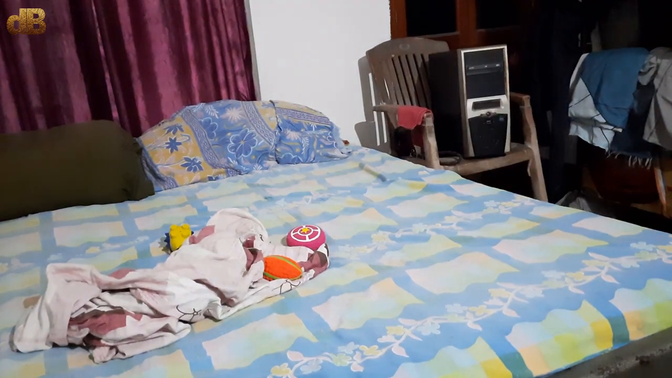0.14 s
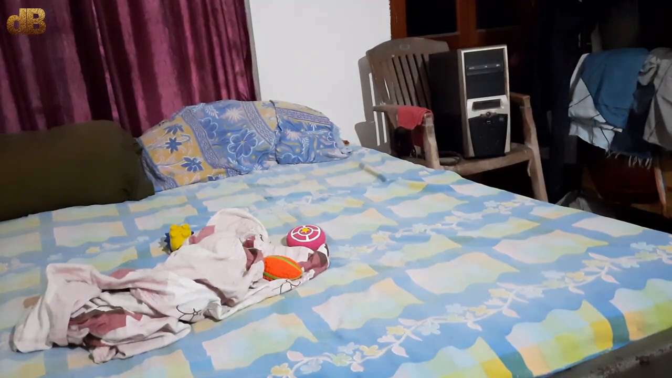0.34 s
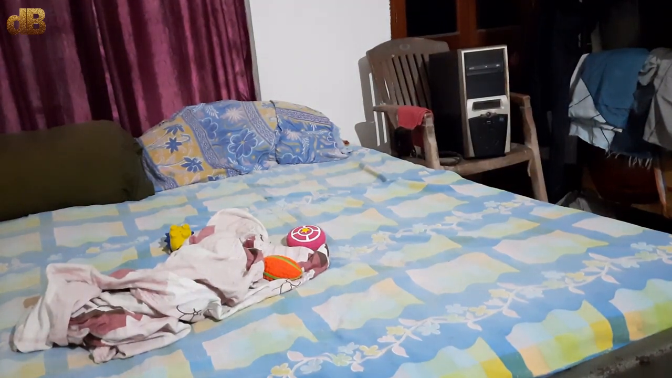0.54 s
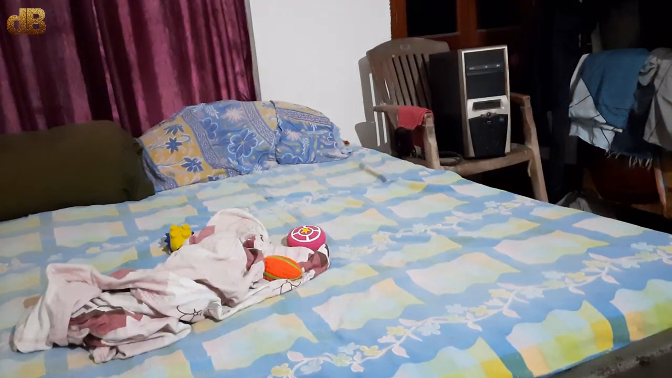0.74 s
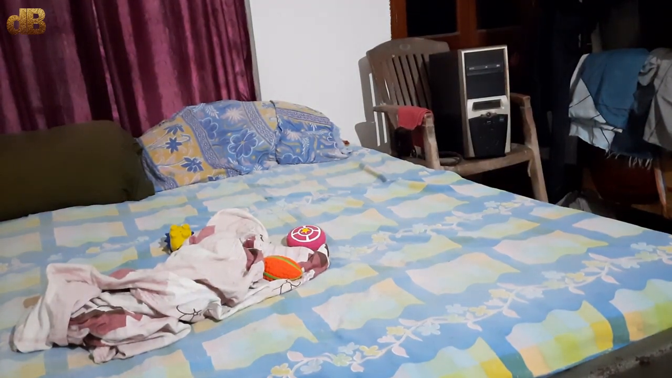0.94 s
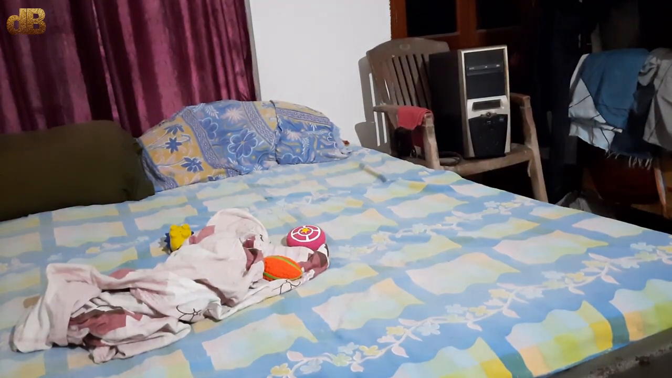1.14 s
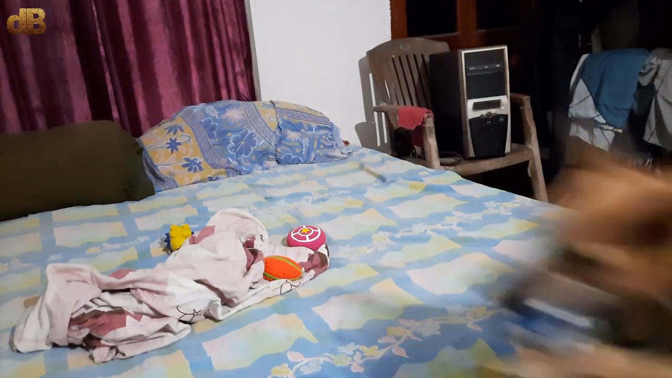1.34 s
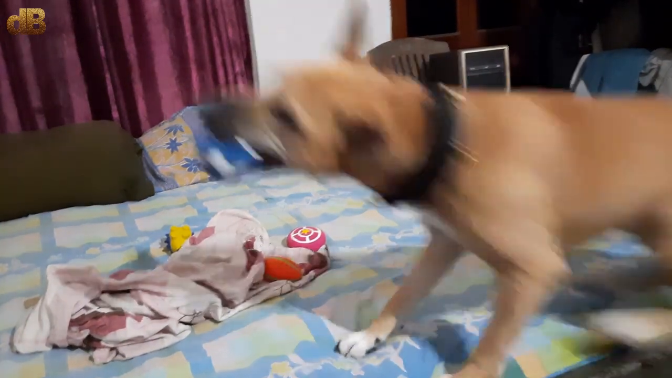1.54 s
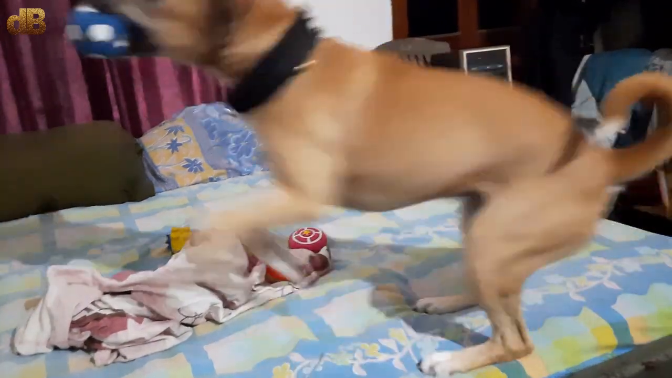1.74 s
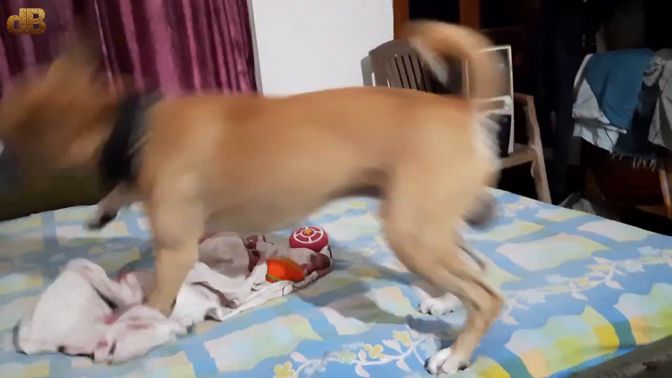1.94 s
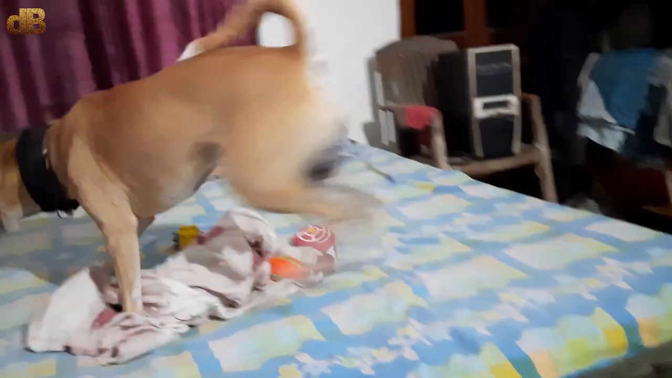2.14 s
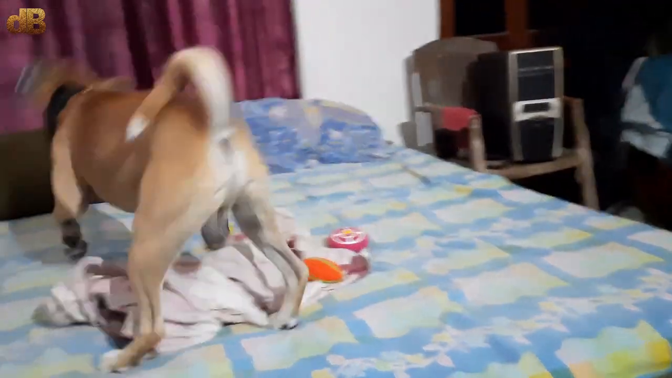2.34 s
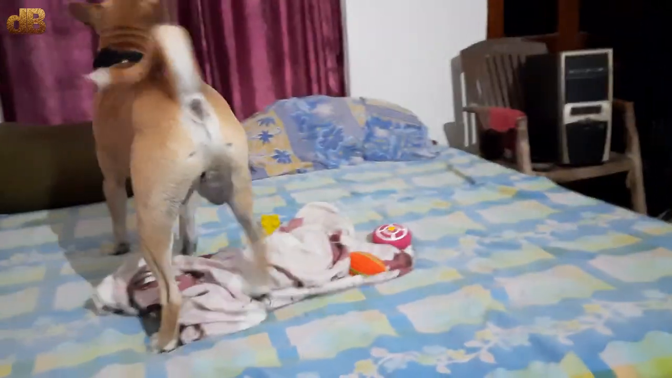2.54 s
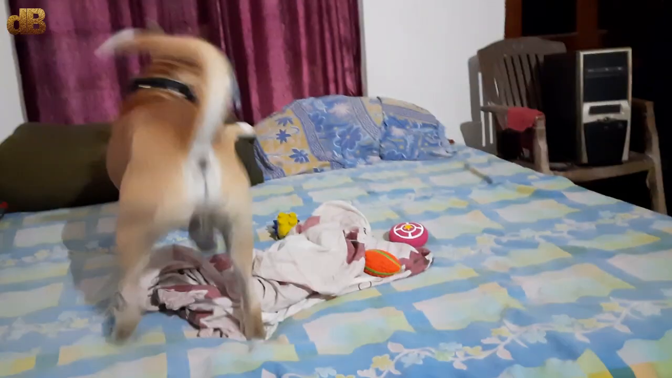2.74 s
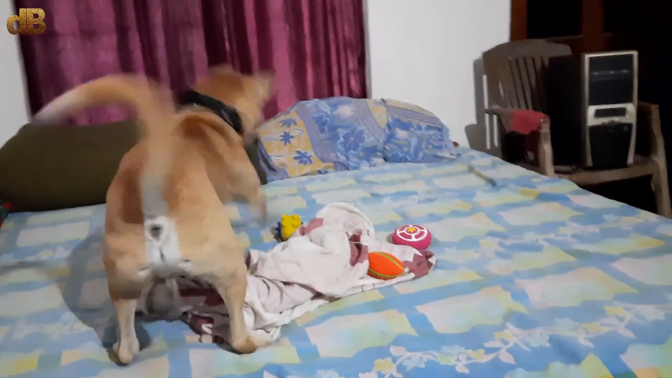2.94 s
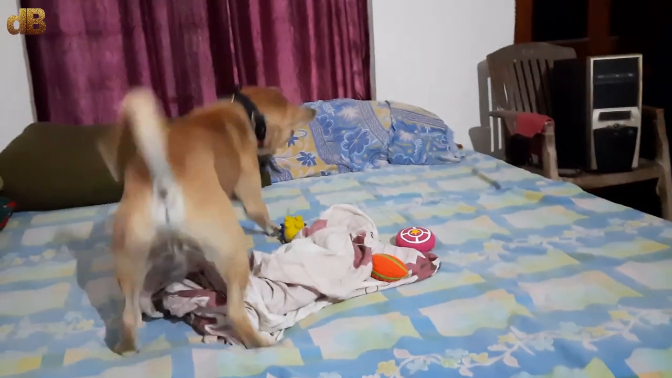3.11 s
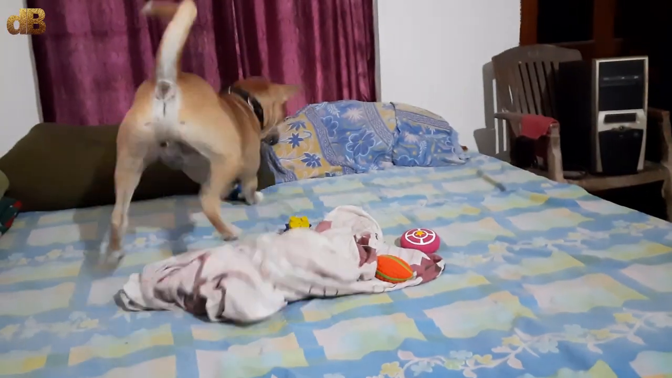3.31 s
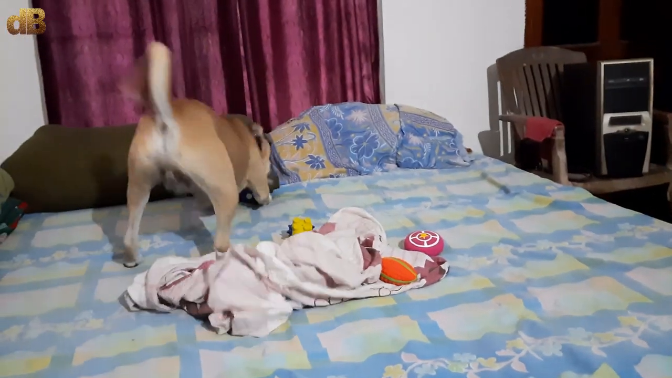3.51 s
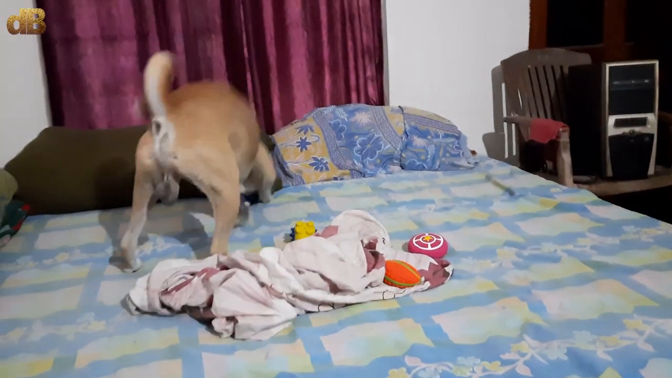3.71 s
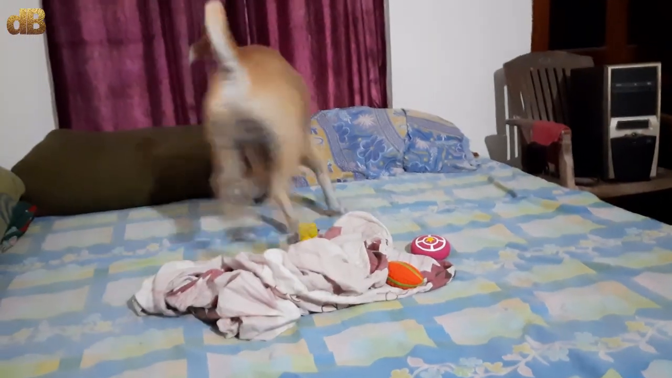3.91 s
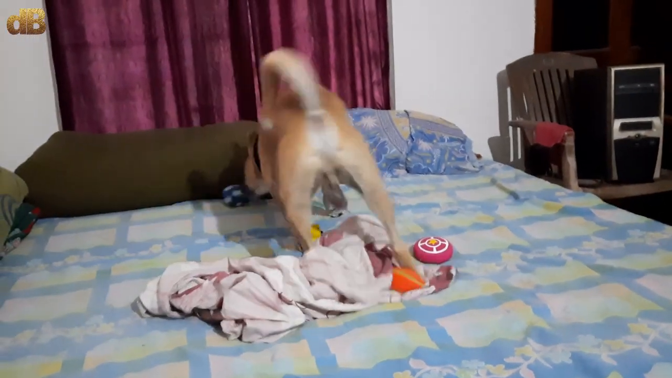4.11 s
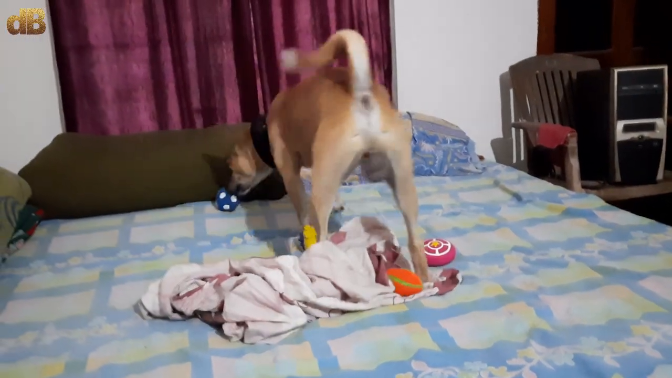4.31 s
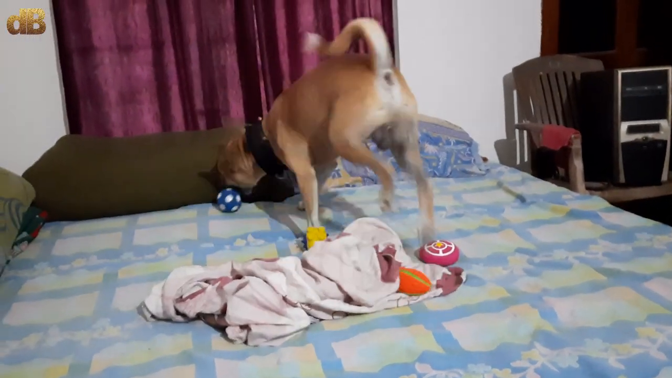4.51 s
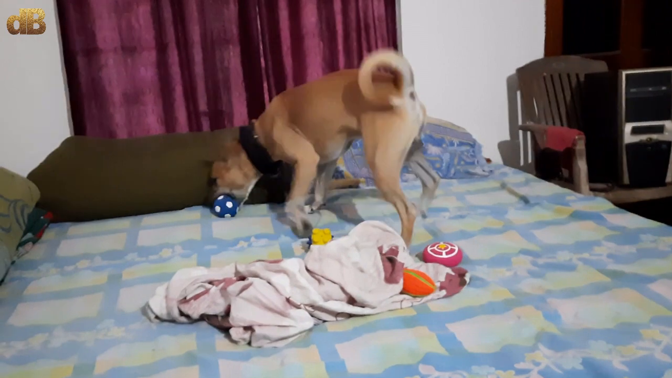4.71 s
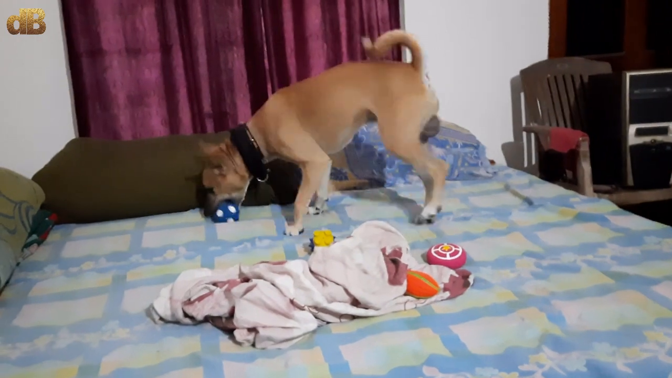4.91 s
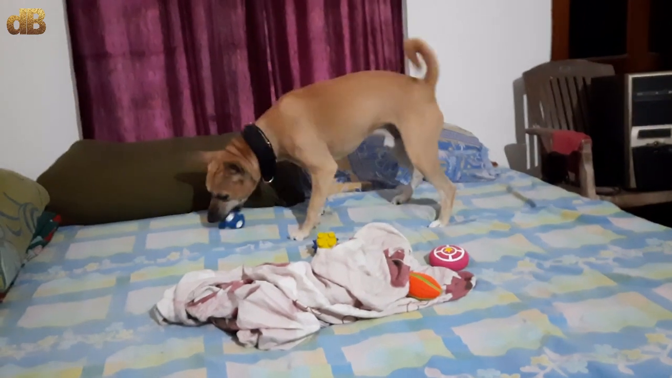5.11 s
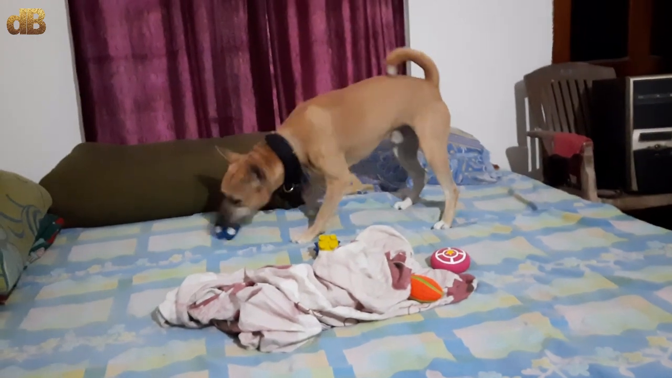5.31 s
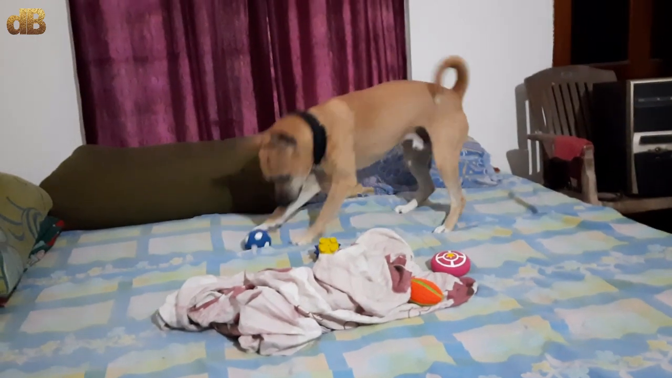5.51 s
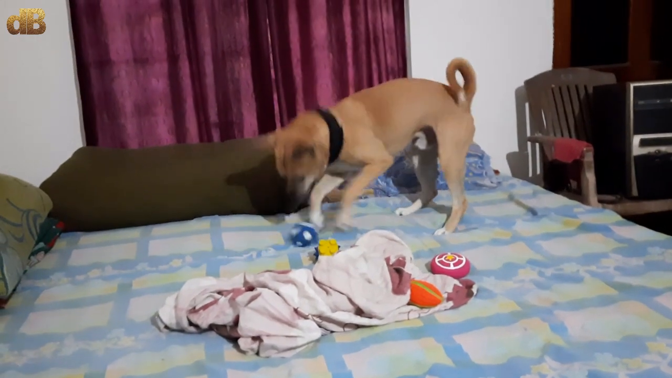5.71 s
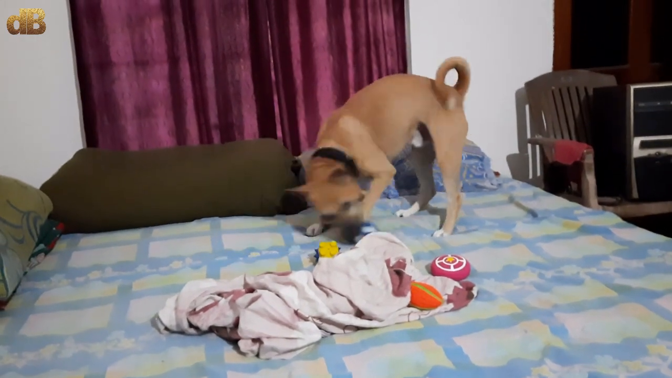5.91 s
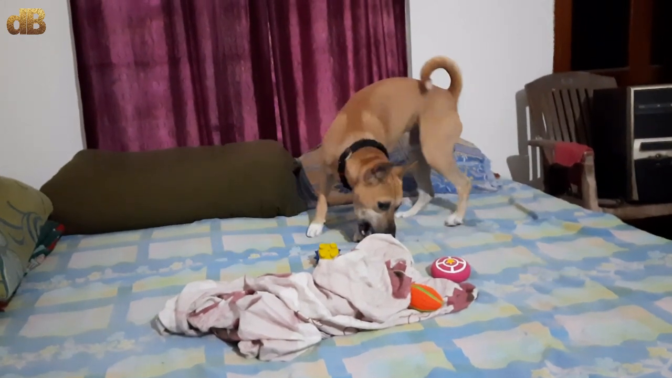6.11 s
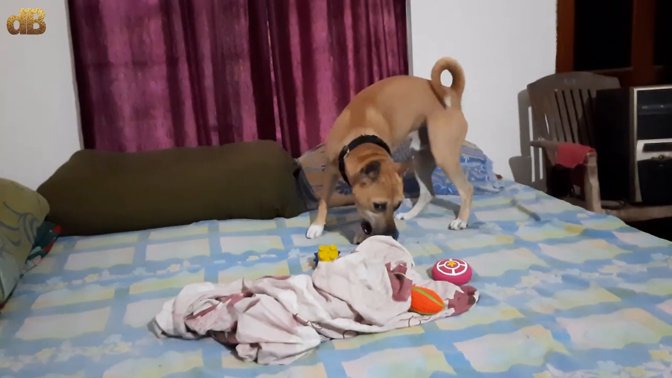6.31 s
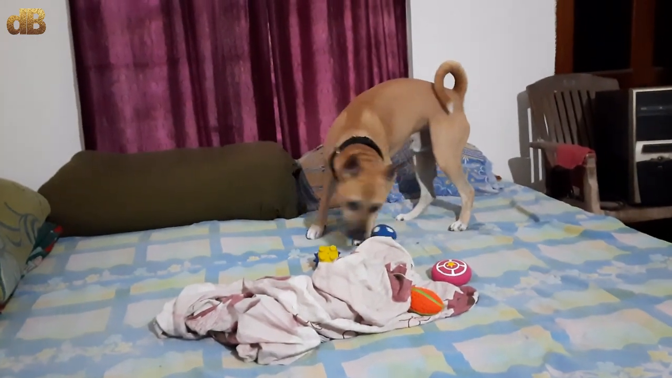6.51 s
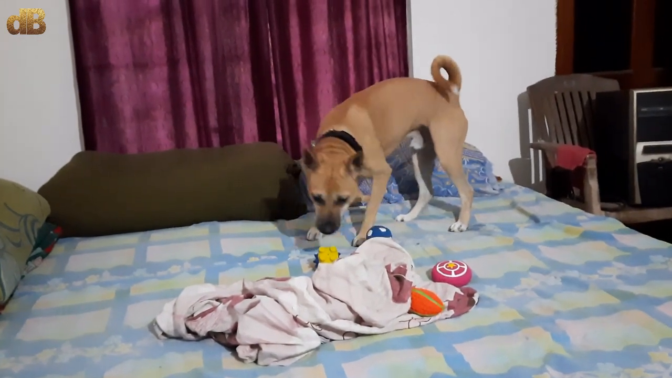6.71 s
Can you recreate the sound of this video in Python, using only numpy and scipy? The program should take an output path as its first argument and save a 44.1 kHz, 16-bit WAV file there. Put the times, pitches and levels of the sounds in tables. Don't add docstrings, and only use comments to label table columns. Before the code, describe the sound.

Small collar bells jingle in a quiet hard-walled room with a faint fan hum. A dog leaps onto the bed: three sharp rubber squeaks come between bell clinks and soft paw thuds. Heavy mattress thumps and sheet rustles follow, with a faint cracked squeak, then three more loud squeaks as it chews. It ends with near silence and light tinkles. Close stereo phone pickup.

```python
import sys
import numpy as np
from scipy import signal
from scipy.fft import rfft, irfft
from scipy.io import wavfile
from scipy.ndimage import uniform_filter1d, minimum_filter1d

SR = 44100
rng = np.random.default_rng(int(sys.argv[2]) if len(sys.argv) > 2 else 0)


def digitize_waveform(pressure):
    field = np.atleast_2d(pressure).T
    bounded = np.clip(field, -1, 1)
    quanta = np.round(bounded * 32767).astype(np.int16)
    wavfile.write(sys.argv[1], SR, quanta)


def volts_from_db(level):
    exponent = np.asarray(level, float) / 20
    return 10 ** exponent


N = 297675

# (frequency [Hz], level [dB])
HUSH = [(15, -22), (25, -31), (134, -5), (277, -10.5), (591, -9), (1290, -1.5), (1650, -12), (2220, -8.5),
        (3430, -27), (6740, -27), (9320, -20), (12500, -18.5), (16000, -27.5)]
HUSH_DB = -66
# (frequency [Hz], level [dB], change once the dog stands in the way [dB])
HUM = [
    (144, -76.5, -4.5),
    (1308, -73.5, -5),
]
ARRIVES_S = 1.3
# (frequency [Hz], likeness [-1 to 1])
SAME = [(30, .98), (180, .95), (350, .86), (600, .4), (1500, -.2), (5000, .15), (15000, .4)]
# (frequency [Hz], t60 [s])
ROOM = [(1000, 0.3), (2640, 0.34), (6960, 0.28)]
# (frequency [Hz], likeness [-1 to 1])
ROOM_SAME = [(100, 0.64), (600, 0.45), (1200, 0.15), (3000, 0.32), (5000, 0.43), (8000, 0.95),
             (14000, 0.97)]
BELLS_WET_DB = 3

# (frequency [Hz], level [dB])
BOOM = [(18, -34.5), (30, -9.5), (43, 0.5), (87, 3), (145, -3.5), (343, -10.5), (500, -14.5), (650, -48),
        (1100, -120)]
# (frequency [Hz], level [dB])
RUSTLE = [(120, -27), (200, 1), (405, -11.5), (445, -9.5), (738, -18), (1100, -18.5), (1430, -39.5),
          (2420, -120)]
# (frequency [Hz], level [dB])
SWISH = [(530, -32.5), (900, 2), (1440, 6.5), (3260, -11.5), (6000, -17), (6650, -8.5), (7000, -5.5),
         (9100, -47.5), (15400, -120)]
# (time of deepest press [s], boom [dB], release [dB/s], scuff of sheets over boom [dB])
STEPS = [(0.629, -69, 27, 0), (1.537, -53, 63, 0.5), (1.77, -45, 141, -15.5), (2.012, -51.5, 25.5, -10),
         (2.35, -50, 99, -11), (2.54, -64, 201, -6), (2.86, -65, 58.5, 7), (2.96, -45, 42, -13.5),
         (3.05, -31, 152.5, -13), (3.3, -50.5, 29.5, -2.5), (3.398, -37, 52.5, -20), (3.48, -41, 166, -8),
         (3.6, -69.5, 39, -27), (3.851, -57, 47, 6), (4.15, -41, 86, -15), (4.51, -66, 28, 12.5),
         (4.649, -44.5, 45.5, -9), (4.721, -58, 89, -36), (5.049, -51, 66.5, -3.5), (5.338, -58, 81, 4),
         (5.569, -60, 25.5, 6), (5.709, -43, 185, -5.5), (5.86, -47, 65.5, -15.5)]
PRESS_DB_PER_S, STILL_DB = 184.5, -74
# (time [s], level [dB])
MOTION = [(0, -80), (1.35, -78.5), (1.54, -61.5), (1.77, -65), (1.95, -76.5), (2.8, -80.5), (3.05, -61.5),
          (3.24, -76), (3.3, -58.5), (3.6, -66), (4.4, -64.5), (4.51, -57), (4.8, -69), (5.1, -64.5),
          (5.5, -71), (5.86, -68), (6.28, -81), (6.75, -83.5)]
# (time [s], peak level [dB], mattress ring [Hz], t60 [s])
THUDS = [(1.487, -49.5, 358, 0.24), (2, -45, 91.3, 0.42), (2.312, -38.5, 88, 0.24),
         (2.824, -47.5, 114, 0.18), (3.016, -47, 89.5, 0.11), (3.308, -32, 115.6, 0.15),
         (3.446, -20, 94.6, 0.23), (3.842, -42, 200, 0.14), (4.099, -34, 113.3, 0.22),
         (4.491, -50.5, 351, 0.43), (5.681, -26, 109, 0.056), (5.825, -39, 70, 0.23)]
# (time [s], peak level [dB], centre [Hz], t60 [s])
KNOCKS = [(1.527, -35.5, 970, 0.03), (4, -43.5, 560, 0.066), (3.836, -41, 520, 0.084),
          (4.2, -45, 690, 0.06), (5.521, -45, 358, 0.022), (3.272, -48, 1400, 0.093),
          (3.286, -46.5, 1940, .08), (1, -53, 2500, 0.059), (.87, -56, 4100, 0.051), (2.94, -44, 340, 0.11),
          (4.6, -45, 450, 0.11), (1.3, -57.5, 3000, 0.082)]

# (frequency [Hz], level [dB], t60 [s])
BELLS = [(4350, -12.5, 0.19), (4710, -11, 0.045), (5650, -20.5, .1), (6460, -29.5, .15), (7365, -17.5, 1),
         (7925, -2.5, 0.091), (8130, 5, 0.034), (8190, -3.5, 0.15), (7700, -26, 0.033), (8750, -8.5, 0.079),
         (8400, -7, 0.12), (9200, -12, 0.072), (9220, -8.5, 0.038), (9540, -4, 0.11), (9160, 3.5, 0.028),
         (9750, -9, 0.046), (11000, -19.5, 0.11), (12220, -18, 0.07), (12900, -14, 0.047),
         (14500, -12.5, .07), (15320, -7.5, 0.084)]
# (time [s], level [dB])
ROLLING = [(0.0, -80), (0.194, -66.5), (0.59, -84), (0.742, -61.5), (1.264, -77.5), (1.402, -55),
           (1.85, -60.5), (2.2, -77), (2.39, -63), (3.1, -64.5), (3.29, -85.5), (3.55, -60.5), (4.016, -59),
           (4.25, -77), (4.602, -61), (5.85, -64.5), (6.3, -70), (6.75, -97)]
# (frequency [Hz], level [dB])
RATTLE = [(1760, -42.5), (3000, -14), (3700, -17), (6950, 1.5), (8000, 3), (8700, -6), (9400, -16.5),
          (10200, -3.5), (16000, -7.5)]
# (time [s], peak level [dB], loudest ring [Hz], tick over the ring [dB])
STRIKES = [(.0672, -56, 12220, -7), (.289, -55, 11000, 2), (0.0904, -40.5, 8400, -0.5),
           (0.0954, -36.5, 9540, -14), (.237, -54, 9220, 0), (0.5478, -36.5, 9540, -9.5),
           (0.6633, -43, 9750, 2.5), (0.7094, -34.5, 8130, 1), (0.8356, -36, 9560, -4),
           (0.9387, -48, 12900, 4), (1.002, -43.5, 12900, -5), (1.058, -47, 8190, 11),
           (1.2019, -47, 15320, -11), (1.2168, -40.5, 8190, -3.5), (1.269, -35, 9750, -2),
           (1.343, -36.5, 8130, -1), (1.451, -34.5, 14500, -2.5), (1.5111, -35.5, 12900, 0.5),
           (1.7605, -33.5, 14500, 0.5), (1.8345, -48, 15320, -7), (1.858, -47.5, 9220, -2),
           (1.936, -52, 12220, 3.5), (2.269, -49, 7365, 8), (2.6938, -46, 9750, 3), (2.8774, -55, 8400, -2),
           (2.937, -41, 12900, -4.5), (3.5404, -41, 8190, 5.5), (3.6536, -35.5, 12900, -6),
           (3.838, -57, 9220, 3), (3.8873, -41.5, 8190, 4.5), (4.023, -34.5, 7365, 0),
           (4.0578, -36.5, 8120, 0.5), (4.372, -53, 9220, -1.5), (4.53, -34.5, 8190, -2.5),
           (4.6258, -25, 9220, -11), (4.753, -40, 7925, -1.5), (4.835, -54, 8130, -6.5),
           (4.848, -48, 12900, -0.5), (5.4848, -44.5, 9750, 6.5), (5.8616, -44, 15100, 2),
           (5.87, -44, 9540, 3.5), (5.8944, -37.5, 12900, 0.5), (5.9883, -46.5, 11000, -2),
           (6.233, -66, 7925, 3), (6.2603, -54, 7300, 2.5), (6.3155, -50, 9540, 0),
           (6.5821, -40.5, 9600, -16), (1.974, -24.5, 7365, 8.5), (2.99, -38.5, 8190, -7),
           (2.945, -43.5, 9750, -4)]
CLATTER_DB, CLATTER_S = -19, .025
# (time [s], peak level [dB], frequency [Hz])
TOUCHES = [(0.11, -62, 5100), (0.27, -64, 7372), (0.59, -67, 5200), (0.88, -63, 5200), (0.941, -67, 9540),
           (1.21, -62.5, 4710), (1.917, -56, 12400), (4.369, -64, 8130), (5.987, -65, 7372),
           (6.409, -65.5, 6700), (6.715, -66, 7372), (2.334, -52, 7600), (2.761, -55, 7372),
           (2.68, -62, 6800), (.2, -65, 4710), (0.84, -66, 4400), (4.47, -54, 7372), (4.75, -61, 5600),
           (4.868, -53, 6600), (6.141, -59, 7372), (0.672, -65, 4400), (0.63, -46, 15320),
           (0.65, -56, 5750), (0.7, -47.5, 7400), (0.67, -52, 7372), (0.773, -61, 7372), (1.442, -48, 7372),
           (1.491, -45.5, 7300), (0.86, -45, 9540), (6.049, -62, 8190), (6.18, -73, 8190), (.86, -51, 7925),
           (1.368, -50, 7200), (1.372, -44, 7372), (1.393, -57, 4710), (1.515, -43.5, 6600),
           (3.556, -48, 7372), (3.665, -49, 6600), (3.76, -50, 7600), (4.07, -48, 8800),
           (2.982, -53, 15320), (2.985, -56, 13000), (4.3885, -58, 8100), (4.43, -53, 7900),
           (4.11, -49, 7400), (4.16, -56, 6700), (3.5, -61, 9220), (3.95, -61, 8190), (4.66, -47, 7200),
           (4.7, -59, 5900), (.13, -58, 8400), (0.39, -69, 6400), (3.04, -61, 8190), (2.72, -58, 5750),
           (0.94, -47, 8190), (1.235, -53, 15320)]
TOUCH_BEAT_HZ = 70
# (time [s], left over right [dB])
COLLAR = [(0, -10.5), (1.3, -14.5), (1.9, 9), (2.3, 0), (2.8, -6), (4.5, 13.5), (5.5, -4.5), (6.75, -5)]

# (time of peak [s], level [dB], rise [dB/s], fall [dB/s])
WHISTLE = [
    (4.94, -39, 444.5, 59.5),
    (5.205, -43, 702, 194.5),
    (5.31, -45, 204.5, 309),
    (5.66, -46.5, 205.5, 189.5),
]
WHISTLE_HZ = 3284
SHUT_S = 5.02

# (start time [s], length [s], level [dB], reed pitch [Hz], swell from start to end [dB])
BITES = [
    (1.56, 0.11, -12.5, 1234, -7.5),
    (1.971, 0.098, -17, 1224, -3.5),
    (2.417, 0.061, -19.5, 1216, 6),
    (3.706, 0.053, -35, 1308, -2),
    (4.923, 0.073, -15.5, 1242, 3),
    (5.155, 0.15, -16.5, 1254, -4.5),
    (5.543, 0.12, -11.5, 1247, -0.5),
    (3.328, 0.096, -33, 2507, -7.5),
]
PRESSURE = [(.085, .55, 0, .12), (.04, .4, 0, .065), (.025, .5, 0, .055), (.14, 0, 0, .02),
            (.03, .35, 0, .09), (.025, .3, 0, .06), (.015, .5, .08, .05), (.02, .3, 0, .03)]
CLOSING = [.005, 0.0047, 0.0031, .004, 0.011, 0.0045, 0.018, 0.0037]
FLAT_SHARE, FLAT_S, SAG_S, SURGE_S = .1, 0.0025, .01, .022
RELEASE_S, RELEASE_DB = 0.019, -1
# (time [s], pitch [Hz], level [dB], brightness [dB/octave])
SLIP = [
    (3.299, 1091, -37.5, -6.5),
    (3.32, 1986, -25, -7.5),
    (3.335, 2932, -22, -11),
    (3.358, 2875, -16, -10.5),
    (3.371, 2850, -30.5, -15),
    (3.381, 2473, -23.5, 2.5),
    (3.392, 1574, -25, -7.5),
    (3.405, 1254, -24, -1),
    (3.437, 1190, -31, -7.5),
]
# (frequency [Hz], level [dB])
REED = [(1230, -10), (3000, -13), (4900, -10), (6300, 0.5), (7500, 1), (9800, -11), (13300, -11.5),
        (15700, -26.5)]
# (mouth resonance [Hz], its boost [dB], fundamental [dB], brightness [dB/octave])
JAWS = [(7140, 3, -0.5, -0.5), (10620, 6, 9.5, 0), (3650, 2.5, 4.5, -1), (3900, 9, 3, -3),
        (11100, 2.5, -4.5, -0.5), (12000, 1.5, -2.5, -0.5), (14500, -10, -4.5, 0), (5000, 17, 0, -5),
        (4300, 7.5, -14.5, 0)]
# (lifted [Hz], lift [dB], shaded [Hz], shade [dB], brightness change [dB/octave])
SHADES = [(11000, 2.5, 5300, -1, -0.5), (4740, 4.5, 3660, -4, -1), (4800, -5.5, 2300, -11, -2),
          (5200, 3, 6600, -3, -1.5), (11200, 9, 11000, -2.5, -3), (13700, 1, 3750, 1, -1.2),
          (6540, 1.5, 8900, -2, 1), (7450, 11, 2500, 4, 0), (5800, 2, 8700, 2, -10.5)]
# (left over right [dB], left leads by [samples], room over direct [dB],
# air rush [dB], pitch flutter [share])
MUZZLE = [(0, 1, 2, -38, .02), (2, 0, 2, -36, .02), (2, 1, 3, -34, .02), (-1, 0, 5, -15, .09),
          (.5, 1, 3, -36, .02), (1.5, 1, 1, -36, .014), (1.5, 1, 5, -26, .12), (1, 0, 4, -17, .08),
          (1, 0, 3, -14, .12)]
# (below the split [dB], above the split [dB])
HEARD = [(-2, 1.3), (-5.5, 5), (-5, 1.8), (-3.5, 0.5), (-8.5, 1.3), (-4.5, 10), (-3, 1.4), (-14, 0.5),
         (-1.5, 0.5)]
SPLIT_HZ = 6800
MOUTH_OCTAVES, SHADE_OCTAVES, AIR_GRAIN_DB = 0.25, 0.13, 3
WOBBLE_DB = 2
# (frequency [Hz], side over mid [dB])
SPREAD = [(600, -3), (1200, 3), (2500, -1), (5000, -2), (8000, -2), (12000, -8), (16000, -8)]
MASKED_DB = 24


def evened(x):
    return x / np.sqrt(np.mean(x ** 2) + 1e-20)


def read(points, hz):
    f, value = np.transpose(points)
    return np.interp(np.log(hz + 1), np.log(f + 1), value)


def along(rows, t):
    s, *columns = np.transpose(rows)
    return [np.interp(t, s, c) for c in columns]


def peaks(rows, t):
    return sum(volts_from_db(db - np.where(t < s, rise * (s - t), fall * (t - s))) for s, db, rise, fall in rows)


def add(mix, s, sound):
    part = mix[..., round(s * SR):][..., :sound.shape[-1]]
    part += sound[..., :part.shape[-1]]


def sides(pan_db):
    return volts_from_db(np.array([[pan_db / 2], [-pan_db / 2]]))


def band(low_hz, high_hz, x):
    return signal.lfilter(*signal.butter(2, [low_hz, high_hz], "bandpass", fs=SR), x)


def noise(spectrum, size, patchy_db, flicker_db):
    frames, hz = 4 * N // size + 5, np.fft.rfftfreq(size, 1 / SR)
    a, b, c, d, patches = rng.standard_normal((frames, len(hz), 5)).T
    patches = uniform_filter1d(patches, size=8, axis=0)
    patches = evened(uniform_filter1d(patches, size=10, axis=1))
    flicker = evened(uniform_filter1d(rng.standard_normal(frames), size=3))
    same = np.clip(read(SAME, hz), -1, 1)[:, None]
    left, other = a + 1j * b, c + 1j * d
    z = np.array([left, same * left + np.sqrt(1 - same ** 2) * other])
    z *= volts_from_db(read(spectrum, hz)[:, None] + patchy_db * patches + flicker_db * flicker)
    return evened(signal.istft(z, nperseg=size, noverlap=3 * size // 4)[1][:, :N])


def room(x, first):
    size = 30000
    taps = np.zeros((2, size))
    at = np.arange(120, size - 20, 20) + rng.integers(0, 20, (2, (size - 121) // 20))
    np.put_along_axis(taps, at, rng.choice([-1., 1.], at.shape), 1)
    np.put_along_axis(taps, rng.integers(60, 900, (2, 6)), first, 1)
    hz, t, z = signal.stft(taps, SR, nperseg=256)
    same = np.clip(read(ROOM_SAME, hz), -1, 1)[:, None]
    z[1] = same * z[0] + np.sqrt(1 - same ** 2) * z[1]
    tail = signal.istft(z * volts_from_db(-60 * t / read(ROOM, hz)[:, None]), SR, nperseg=256)[1]
    tail[:, :50] = 0
    return signal.fftconvolve(x[None], tail / np.linalg.norm(tail[0]), axes=1)


def hush():
    t = np.arange(N) / SR
    out = volts_from_db(HUSH_DB) * noise(HUSH, size=1024, patchy_db=-1.5, flicker_db=3.0)
    blocked = np.clip((t - ARRIVES_S) / .2, 0, 1)
    for hz, db, shaded_db in HUM:
        tone = np.sqrt(2) * np.sin(2 * np.pi * hz * t)
        out += sides(-6) * volts_from_db(db + shaded_db * blocked) * tone
    return out


def mattress():
    t = np.arange(N) / SR
    presses = [(s, db, PRESS_DB_PER_S, fall) for s, db, fall, _ in STEPS]
    scuffs = [(s, db + scuff_db, PRESS_DB_PER_S, 1.59 * fall) for s, db, fall, scuff_db in STEPS]
    boom = volts_from_db(STILL_DB) + peaks(presses, t)
    rustle = volts_from_db(STILL_DB - 0.5) + peaks(scuffs, t)
    out = sides(-1.7) * volts_from_db(-5.0) * boom * noise(BOOM, size=2048, patchy_db=0.5, flicker_db=-3.0)
    out += volts_from_db(2.0) * rustle * noise(RUSTLE, size=512, patchy_db=3.0, flicker_db=1.0)
    out += volts_from_db(along(MOTION, t)[0] + 7.5) * noise(SWISH, size=512, patchy_db=2.5, flicker_db=1.0)
    return out


def paw_falls():
    out, t = np.zeros((2, N)), np.arange(SR // 3) / SR
    for s, peak_db, hz, t60 in THUDS:
        landing = 1 - np.exp(-t * hz * 1.5)
        fall = volts_from_db(peak_db - 2.0 - 60 * t / max(t60, .01)) * np.sin(2 * np.pi * hz * t) * landing
        add(out, s, sides(-1.9) * fall)
    for s, peak_db, hz, t60 in KNOCKS:
        puff = rng.standard_normal((2, len(t)))
        puff = evened(band(hz / 1.45, hz * 1.45, puff[0] + .6 * puff))
        add(out, s, volts_from_db(peak_db - 60 * t / max(t60, .03)) * np.minimum(t * hz / 2, 1) * puff)
    return out


def rolling():
    level = volts_from_db(along(ROLLING, np.arange(N) / SR)[0])
    t, out = np.arange(SR // 5) / SR, np.zeros(N)
    for hz, db, t60 in BELLS:
        knocks = volts_from_db(3.0 * np.minimum(rng.exponential(1, N), 3))
        knocks *= rng.random(N) < 25 / SR
        ring = volts_from_db(db - 60 * t / t60) * np.sin(2 * np.pi * hz * t)
        out += signal.oaconvolve(knocks * level, ring)[:N]
    out *= np.sqrt(np.mean(level ** 2)) / out.std()
    return volts_from_db(-7) * out + volts_from_db(-4.5) * level * noise(RATTLE, size=256, patchy_db=3.0, flicker_db=4.0)


def touches():
    out, t = np.zeros(N), np.arange(SR // 4) / SR
    for s, peak_db, hz in TOUCHES:
        ring = volts_from_db(peak_db - 60 * t / 0.077) * np.sin(2 * np.pi * hz * t)
        ring *= 1 - np.exp(-t / 0.0013)
        ring *= 1 + .5 * np.cos(2 * np.pi * (TOUCH_BEAT_HZ * t + 7 * s))
        add(out, s, ring)
    return out


def strikes():
    out, t = np.zeros(N), np.arange(SR // 4) / SR
    hz, db, t60 = np.transpose(BELLS)[..., None]
    chance = rng.standard_normal((len(STRIKES), 2, len(BELLS), 1))
    ticks = band(7000, 15500, rng.standard_normal((len(STRIKES), len(t))))
    snap, clatter = np.exp(-t / .0008), np.exp(-t / CLATTER_S)
    for (s, peak_db, ring_hz, tick_db), (luck, phase), tick in zip(STRIKES, chance, ticks):
        away = abs(np.log2(hz / ring_hz))
        struck = db + 3.5 * luck - 24.0 * away + 9.0 * (away == away.min())
        modes = volts_from_db(struck - struck.max() - 60 * t / t60) * np.sin(2 * np.pi * hz * t + 3 * phase)
        ring = modes.sum(0) * (1 - np.exp(-t / 0.0024))
        ring += tick * (volts_from_db(tick_db + 10) * snap + volts_from_db(tick_db / 2 + CLATTER_DB) * clatter)
        add(out, s - .001, volts_from_db(peak_db - 9.0) * ring)
    return out


def whistle():
    t = np.arange(N) / SR
    hz = WHISTLE_HZ * (1 + .3 * uniform_filter1d(rng.standard_normal(N), size=300))
    first = peaks(WHISTLE[:1], t) * volts_from_db(-400 * np.maximum(t - SHUT_S, 0))
    return (first + peaks(WHISTLE[1:], t)) * np.sqrt(2) * np.sin(2 * np.pi * np.cumsum(hz) / SR)


def squeeze(start, length, level_db, top_hz, swell_db, arch, top, surge, sag, closing_s):
    t = np.arange(0, length, 1 / SR)
    u, early = t / length, (t / SURGE_S) ** 2
    share = 1 - FLAT_SHARE * np.exp(-t / FLAT_S) - arch * (u - top) ** 2 - sag * np.exp((t - length) / SAG_S)
    hz = top_hz * (share + surge * early * np.exp(1 - early))
    closing_db = -24 * np.maximum(1 - t / closing_s, 0)
    opening_db = RELEASE_DB * np.maximum(1 - (length - t) / RELEASE_S, 0)
    return start + t, hz, level_db + swell_db * (u - .5) + closing_db + opening_db, 0 * t


def squeak(t, hz, level_db, tilt_db, jaws, shades, air_db, flutter):
    mouth_hz, boost_db, low_db, bright_db = jaws
    lift_hz, lift_db, shade_hz, shade_db, brighten_db = shades
    jitter = uniform_filter1d(rng.standard_normal(len(t)), size=150)
    hz = uniform_filter1d(hz, size=120) * (1 + flutter * jitter)
    order = np.arange(1, 15)[:, None]
    partial_hz = order * hz
    height_db = read(REED, partial_hz) + low_db * (partial_hz < 1800)
    for at_hz, db, octaves in ((mouth_hz, boost_db, MOUTH_OCTAVES), (lift_hz, lift_db, SHADE_OCTAVES),
                               (shade_hz, shade_db, SHADE_OCTAVES)):
        height_db += db * np.exp(-(np.log2(partial_hz / at_hz) / octaves) ** 2)
    bright_db = bright_db + brighten_db * np.linspace(-.5, .5, len(t))
    height_db += (tilt_db + bright_db) * np.log2(partial_hz / 6000)
    wobble = evened(uniform_filter1d(rng.standard_normal(height_db.shape), size=1400, mode="wrap"))
    audible = partial_hz < 16500
    height = volts_from_db(height_db + WOBBLE_DB * wobble) * audible
    tone = (height * np.cos(2 * np.pi * order * np.cumsum(hz) / SR + order ** 2)).sum(0)
    tone /= np.sqrt((height ** 2).sum(0) / 2)
    air = evened(band(1700, 8500, rng.standard_normal(len(t))))
    grain = evened(uniform_filter1d(rng.standard_normal(len(t)), size=90))
    air = evened(air * volts_from_db(AIR_GRAIN_DB * grain))
    return volts_from_db(level_db) * (tone + volts_from_db(air_db) * air) * signal.windows.tukey(len(t), .05)


def settle(sound, dry):
    def broad(z):
        power = uniform_filter1d(abs(z) ** 2, size=size // 60)
        return np.sqrt(abs(uniform_filter1d(power, size=size // 60)) + 1e-12)

    size = sound.shape[1]
    mid, side = rfft(np.array([sound[0] + sound[1], sound[0] - sound[1]]) / 2)
    spread = volts_from_db(read(SPREAD, np.fft.rfftfreq(size, 1 / SR)))
    colour = broad(rfft(dry, size)) / np.hypot(1, spread)
    mid = irfft(mid / broad(mid) * colour, size)
    side = irfft(side / broad(side) * colour * spread, size)
    return np.array([mid + side, mid - side])


def bites(out):
    slip_t = np.arange(SLIP[0][0], SLIP[-1][0], 1 / SR)
    drives = [squeeze(*row, *bend, closing_s) for row, bend, closing_s in zip(BITES, PRESSURE, CLOSING)]
    drives.append((slip_t, *along(SLIP, slip_t)))
    for drive, jaws, shades, heard, muzzle in zip(drives, JAWS, SHADES, HEARD, MUZZLE):
        low_db, high_db = heard
        pan_db, lead, wet_db, air_db, flutter = muzzle
        dry = squeak(*drive, jaws, shades, air_db, flutter) / np.hypot(1, volts_from_db(wet_db))
        sound = volts_from_db(wet_db) * room(dry, first=2.2)
        add(sound, 0, sides(pan_db) * np.array([dry, np.roll(dry, lead)]))
        sound = settle(sound, dry)
        high = signal.sosfiltfilt(signal.butter(3, SPLIT_HZ, "highpass", fs=SR, output="sos"), sound)
        add(out, drive[0][0], sides(low_db) * (sound - high) + sides(high_db) * high)


def scene():
    collar = sides(along(COLLAR, np.arange(N) / SR)[0])[:, 0]
    near = (strikes() + touches() + rolling()) * collar + volts_from_db(-3.0) * whistle()
    out = near + volts_from_db(BELLS_WET_DB) * room(near.mean(0), first=2.3)[:, :N]
    out += sides(0.12) * (mattress() + paw_falls() + hush())
    bites(out)
    return out


def low_pass(x):
    return signal.sosfilt(signal.butter(12, 15900, fs=SR, output="sos"), x)


def record(dry):
    heard = signal.sosfilt(signal.butter(3, 42, "highpass", fs=SR, output="sos"), dry)
    heard = signal.sosfilt(signal.ellip(8, .5, 70, 15750, fs=SR, output="sos"), heard)
    hz, _, z = signal.stft(heard, SR, nperseg=1024)
    power = uniform_filter1d((abs(z) ** 2).mean(0), size=5, axis=0)
    loudest = -minimum_filter1d(-power, size=45, axis=0)
    middle = (abs(hz - 4100) < 1900)[:, None]
    masked = (power < loudest / volts_from_db(2 * MASKED_DB)) & middle
    heard = signal.istft(z * np.where(masked, .1, 1), SR, nperseg=1024)[1][:, :N]
    return low_pass(heard)


dry = scene()
out = record(dry)
digitize_waveform(out)
```